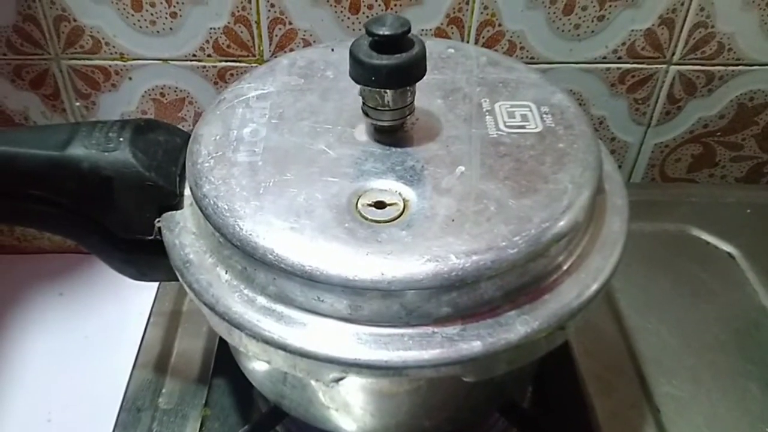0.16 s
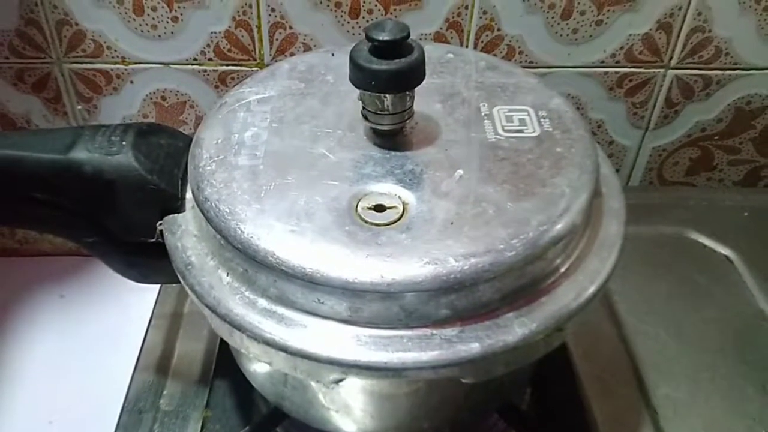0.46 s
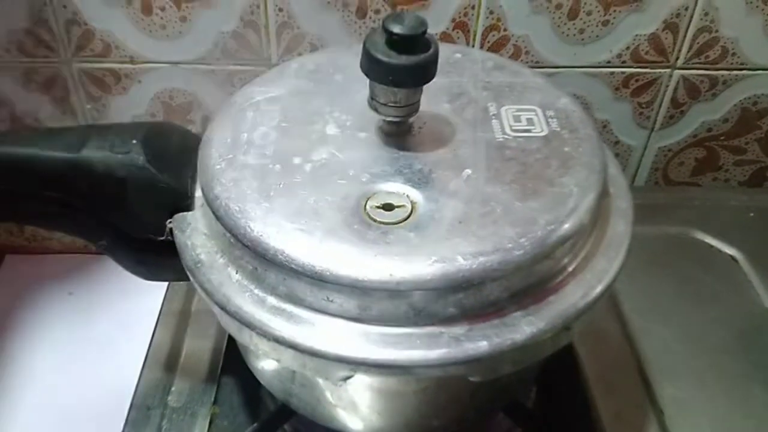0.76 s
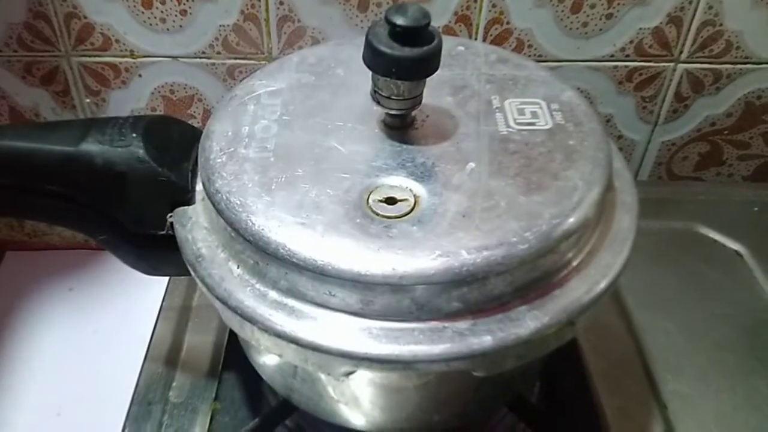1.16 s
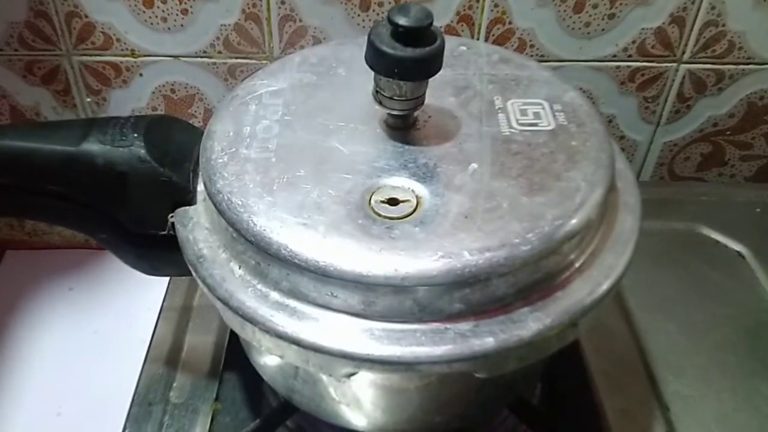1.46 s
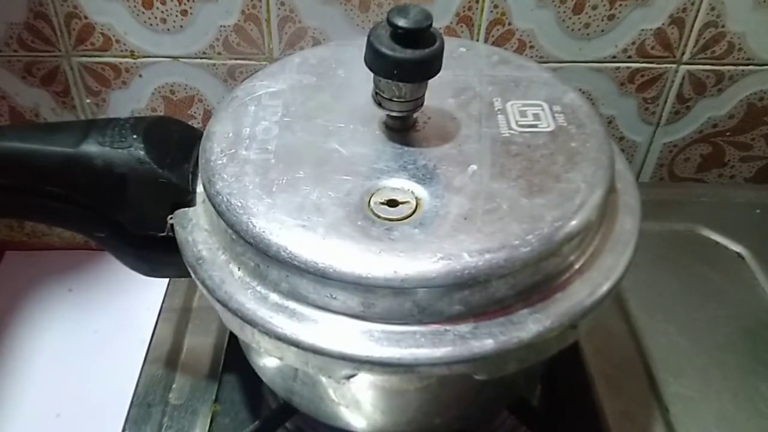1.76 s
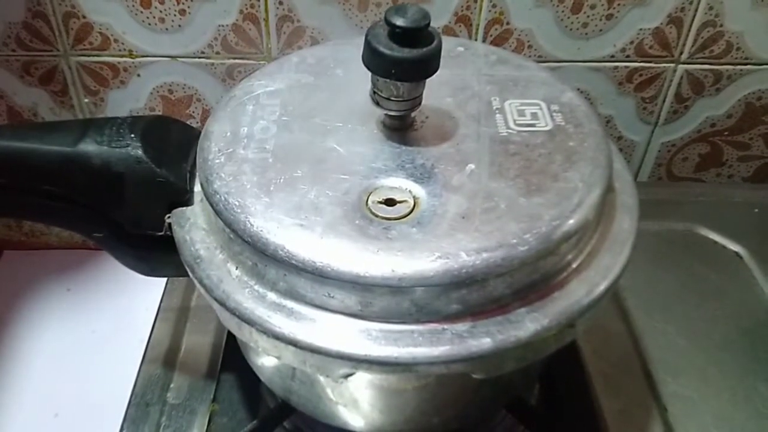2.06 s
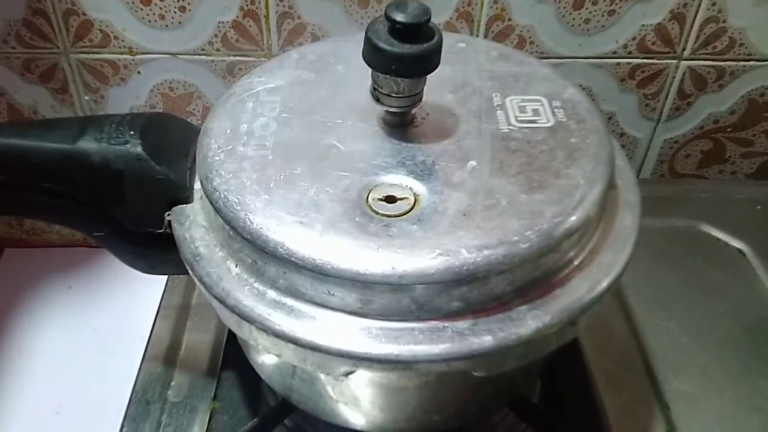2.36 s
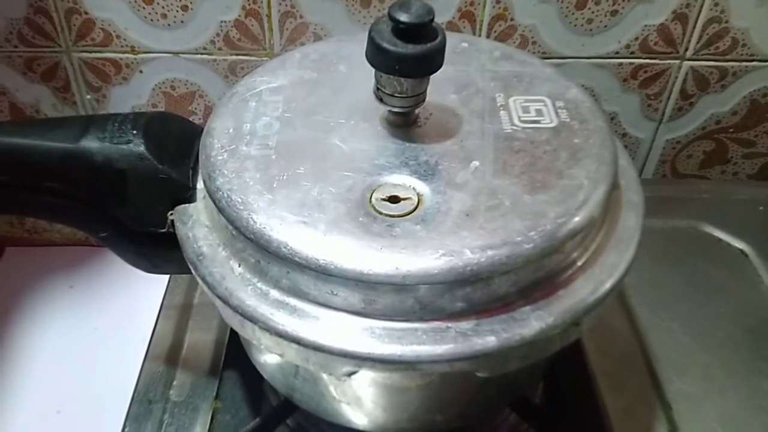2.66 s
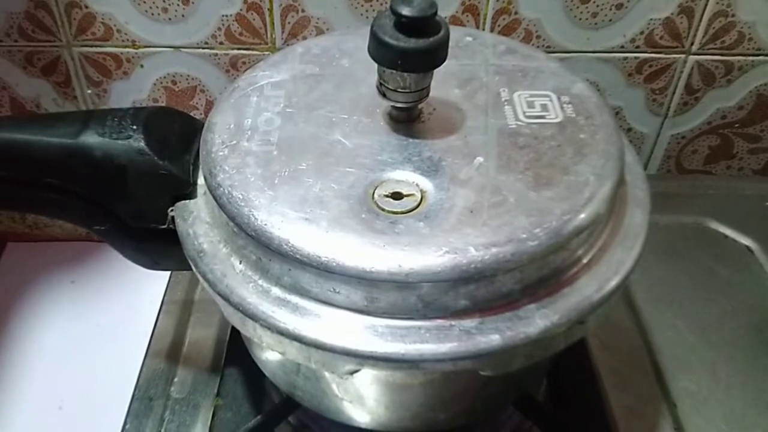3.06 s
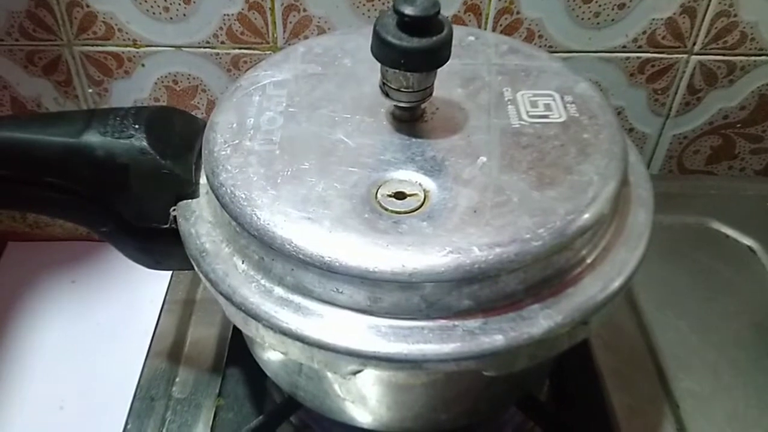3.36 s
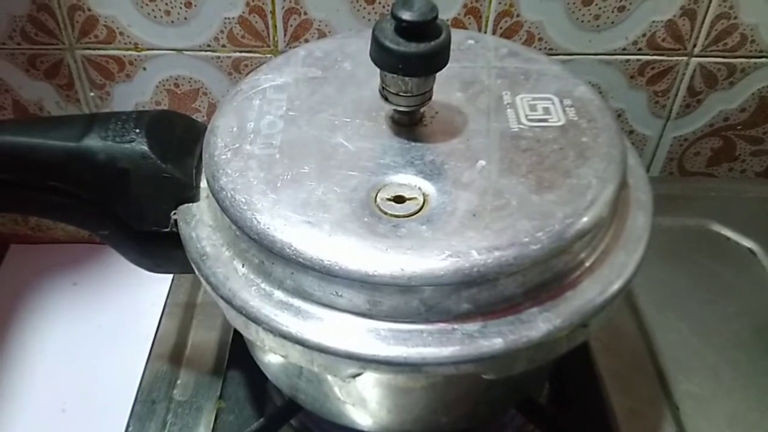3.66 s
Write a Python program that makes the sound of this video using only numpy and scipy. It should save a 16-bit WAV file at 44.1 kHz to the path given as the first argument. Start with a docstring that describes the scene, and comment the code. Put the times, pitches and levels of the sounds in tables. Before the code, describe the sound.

A pressure cooker vents steam in a kitchen, heard very close. For the first 0.5 s a thin, high hiss seeps over a low, fluttering gas burner rumble. Around 0.53 s the weight lifts with a short knock and a loud, bright, rushing jet bursts out, harsh with microphone overload. A softer knock at 0.75 s is nearly buried. The roar holds steady until 3.8 s, its top dulling slightly, left side stronger.

```python
"""A pressure cooker on a gas stove, close to a phone with two microphone ports, for 3.8 s.
The burner rumbles underneath, as low noise, while steam noise seeps thinly under the weight.
At about half a second the weight lifts with a small knock of decaying sines and the jet roars out as
coloured noise; flat noise of the overloaded microphones joins it and the rumble is heard more faintly.
A softer knock follows at 0.75 s; the rumble comes up again and the top of the jet fades as pressure drops."""
import sys
import numpy as np
from scipy import signal
from scipy.fft import rfft, irfft
from scipy.io import wavfile
from scipy.ndimage import uniform_filter1d

SR = 44100
rng = np.random.default_rng(int(sys.argv[2]) if len(sys.argv) > 2 else 0)


def convert_level_to_amplitude(level_db):
    """Map a level in decibels to its linear amplitude factor."""
    exponent = np.asarray(level_db, float) / 20
    return 10 ** exponent


def put_to_file(sound):
    """Save the sound as 16-bit audio at rate SR, in the file named by the first command-line argument."""
    columns = np.atleast_2d(sound).T  # one column per channel
    safe = np.clip(columns, -1, 1)
    whole_steps = np.round(safe * 32767)
    wavfile.write(sys.argv[1], SR, whole_steps.astype(np.int16))


N = 167580  # samples, 3.8 s

STEAM_DB = -6  # trim added to the level curves of the seep and of the jet's roar


def curve(table, column=1):
    """One column of a table as a line over time."""
    rows = np.array(table)
    return np.interp(np.arange(N) / SR, rows[:, 0], rows[:, column])


def colour(table, hz):
    """Gain of a (frequency [Hz], level [dB]) table on a log-frequency axis."""
    rows = np.array(table)
    return convert_level_to_amplitude(np.interp(np.log(hz + 1), np.log(rows[:, 0]), rows[:, 1]))


def walk(rate):
    """Random levels held 1 / rate s and slewed twice; spread 1."""
    hold = int(SR / rate)
    steps = np.repeat(rng.standard_normal(N // hold + 1), hold)
    line = uniform_filter1d(uniform_filter1d(steps, hold), hold)[:N]
    return (line - line.mean()) / line.std()


ECHO_T60_S, ECHO_DB = 0.14, 3.5  # echo energy against the direct sound, before the paths are flattened
PORT_LAG_S = 5e-5  # the common noise reaches the left port this much later


def turbulence(shared):
    """Spectra of two noises; a common part (power share 0-1) reaches each port by its own short echoes."""
    t = np.arange(8192) / SR
    echoes = convert_level_to_amplitude(ECHO_DB) * rng.standard_normal((2, 8192)) * convert_level_to_amplitude(-60 * t / ECHO_T60_S)
    echoes *= np.sqrt(2 * np.log(1000) / (ECHO_T60_S * SR))  # unit energy over the whole decay
    echoes[:, 0] = 1  # direct sound
    paths = rfft(echoes, N)
    paths[0] *= np.exp(-2j * np.pi * np.arange(N // 2 + 1) * SR / N * PORT_LAG_S)
    paths /= np.sqrt(uniform_filter1d(np.abs(paths) ** 2, size=1500))  # only the fine ripple stays
    shared = np.clip(shared, 0, 1)
    common = np.sqrt(shared) * paths * rfft(rng.standard_normal(N))
    separate = np.sqrt(1 - shared) * rfft(rng.standard_normal((2, N)))
    return common + separate


SWELL_DB, SPUTTER_DB, FLICKER_DB = 0.52, 0.49, 0.3  # rms spread of each random level
DULL_FULL_HZ = 18000  # the dulling grows as frequency ** 4 and would be whole here


def restless(spectra, hz, dull_db):
    """Steam noise in overlapping bands that swell and sputter together and flicker alone."""
    centres = np.geomspace(100, 16000, num=16)
    place = np.interp(np.log(hz + 1), np.log(centres), np.arange(len(centres)))
    together = SWELL_DB * walk(1.58) + SPUTTER_DB * walk(25.15)
    out = 0
    for k, centre in enumerate(centres):
        share = np.clip(1 - np.abs(place - k), 0, 1)
        dulling = dull_db * min(centre / DULL_FULL_HZ, 1.5) ** 4
        level_db = together + FLICKER_DB * walk(9.02) + dulling
        out = out + convert_level_to_amplitude(level_db) * irfft(spectra * share, N)
    return out


# colour of the burner rumble: (frequency [Hz], relative level [dB per Hz])
BURNER_COLOUR = [(12, -50), (25, -27), (42, -18), (56, -6), (66, 1), (78, -3), (95, -13), (130, -16),
                 (170, -32), (300, -28), (500, -57)]
# the phone's gain turns the rumble down as the jet opens, and later back up; drawn as a fixed curve:
# (time [s], level [dB])
BURNER_LEVEL = [(0, -47), (.15, -45), (.33, -41.5), (.45, -43), (.6, -52), (.9, -51), (1.7, -55),
                (2.1, -44.5), (2.5, -48.5), (2.9, -42.5), (3.2, -40), (3.45, -47), (3.8, -50)]
BURNER_FLUTTER_DB = 2  # rms spread of the flutter
BURNER_EVEN = 0.42  # evenness 0-1 of the roar from moment to moment


def burner(hz):
    """Fluttering low roar of the gas flame: coloured noise, its own swells partly evened out."""
    roar = irfft(rfft(rng.standard_normal(N)) * colour(BURNER_COLOUR, hz), N)
    slow_power = uniform_filter1d(uniform_filter1d(roar ** 2, size=4000), size=4000)
    roar = roar / slow_power ** (np.clip(BURNER_EVEN, 0, 1) / 2)
    roar = roar * convert_level_to_amplitude(BURNER_FLUTTER_DB * walk(8.05))
    return roar / roar.std() * convert_level_to_amplitude(curve(BURNER_LEVEL))


# colour of the thin seep at the left and the right port: (frequency [Hz], relative level [dB per Hz])
SEEP_COLOUR_LEFT = [(220, -34), (730, -34.5), (1080, -31), (2580, -25.5), (3060, -18.5), (3400, -27),
                    (3920, -19), (4740, -17.5), (5340, -10.5), (6240, -11.5), (6500, -11.5), (7970, -20.5),
                    (9470, -13.5), (12270, -20.5), (13520, -19.1), (15460, -27)]
SEEP_COLOUR_RIGHT = [(220, -33), (650, -38.5), (2410, -27.5), (2760, -23), (4780, -28), (6120, -27),
                     (7060, -39), (7750, -33.5), (8010, -44.5), (9390, -24), (11670, -28.6), (13310, -21),
                     (15030, -34.1), (15460, -47.0)]
# the seep swells, then gives way as the weight lifts: (time [s], level before STEAM_DB [dB])
SEEP_LEVEL = [(0, -0.5), (.1, -0.5), (.2, 1), (.3, 0), (.43, 0.5), (.445, 3), (.47, 4), (.5, 2), (.53, 8.5),
              (.56, -10), (.62, -40)]
SEEP_SHARED, SEEP_SHARED_BASS_HZ = 0.58, 500  # power share common to both ports, rising to 1 in the bass


def seep(hz):
    """Thin hiss of steam under the seated weight; its bass is alike at both ports but for the echoes."""
    ports = np.array([colour(SEEP_COLOUR_LEFT, hz), colour(SEEP_COLOUR_RIGHT, hz)])
    shared = SEEP_SHARED + (1 - SEEP_SHARED) / (1 + (hz / SEEP_SHARED_BASS_HZ) ** 2)
    hiss = restless(turbulence(shared) * ports, hz, 0)
    return hiss * convert_level_to_amplitude(STEAM_DB + curve(SEEP_LEVEL))


# ringing modes of the weight and lid: (frequency [Hz], relative level [dB], decay by 60 dB [s])
WEIGHT_MODES = [(304, -6, 0.044), (530, -1, 0.044), (756, -4, .03), (1000, 1.5, 0.032), (1300, -2, .04),
                (1900, 1, 0.033), (2300, 4, .02), (2780, 5, 0.03), (3470, 6, .02)]
# knocks of the weight as it lifts and settles: (time [s], level [dB])
WEIGHT_KNOCKS = [(.534, -22.5), (.75, -30)]
KNOCK_PUSH_S = .003  # time constant of the soft onset


def knock():
    """Soft pushes ring the weight and lid briefly as decaying sines."""
    out = 0
    for start, level_db in WEIGHT_KNOCKS:
        t = np.clip(np.arange(N) / SR - start, 0, 1)
        ring = sum(convert_level_to_amplitude(db - 60 * t / t60) * np.sin(2 * np.pi * f * t) for f, db, t60 in WEIGHT_MODES)
        push = 1 - np.exp(-t / KNOCK_PUSH_S)
        out = out + convert_level_to_amplitude(level_db) * ring * push
    return out


# colour of the open jet at the left and the right port, lid and tile echoes included:
# (frequency [Hz], relative level [dB per Hz])
JET_COLOUR_LEFT = [(220, -19), (1850, -18), (2840, -7), (3450, -9.5), (4440, -5), (5510, -1.7),
                   (5640, -4.5), (5810, -0.1), (6420, -5.5), (6550, -1.8), (7110, -4), (7620, -9),
                   (8230, -8), (8790, -6), (9090, -0.2), (9260, -9.5), (9390, -2.1), (9560, -2),
                   (10470, 1.2), (10640, -3.5), (11370, 0.5), (12580, -10), (12960, -3), (13440, -10),
                   (14990, -9), (15460, -15.5)]
JET_COLOUR_RIGHT = [(220, -29.5), (860, -31.5), (1420, -19), (3270, -9), (3880, -12), (5120, -10),
                    (5340, -18), (6160, -15), (6850, -19), (6980, -21.2), (7110, -21), (7540, -25),
                    (7710, -23.4), (7920, -18.9), (8270, -27.6), (8480, -28), (8960, -15), (9430, -12),
                    (10120, -7.5), (10470, -9), (10980, -12), (11540, -6.5), (11800, -12), (13090, -7.9),
                    (15120, -16), (15460, -15)]
# the valve opens: (time [s], roar level before STEAM_DB [dB], overload noise before the port levels [dB])
VENT_LEVELS = [(.44, -44, -60), (.49, -22, -34), (.52, -11, -24), (.535, -3, -2), (.565, 0, 2),
               (.9, 0.5, 2), (1.3, 0, 0), (1.8, -0.5, .5), (2.2, 0.5, 0), (2.6, 0, -1), (3.0, 0, -4),
               (3.4, 0, -4.5), (3.8, 1, -6)]
JET_SHARED = 0.46  # power share of the roar common to both ports
DULLING_DB_PER_S = -1.3  # slope at DULL_FULL_HZ: the top of the jet fades as pressure drops
RIGHT_FADE_DB_PER_S = -0.65  # the right port loses the roar a little faster
OVERLOAD_LEFT_DB, OVERLOAD_RIGHT_DB, OVERLOAD_TOP_HZ = -16, -37, 7000
LOW_CUT_HZ = 30  # for roar and overload noise


def jet(hz):
    """Steam roar of the open valve, plus flat overload noise of the microphones, strongest at the left."""
    t = np.arange(N) / SR
    low_cut = hz ** 2 / (hz ** 2 + LOW_CUT_HZ ** 2)
    ports = np.array([colour(JET_COLOUR_LEFT, hz), colour(JET_COLOUR_RIGHT, hz)]) * low_cut
    # both slow fades pivot at 2 s
    roar = restless(turbulence(JET_SHARED) * ports, hz, DULLING_DB_PER_S * (t - 2))
    roar = roar * convert_level_to_amplitude(np.outer([0, RIGHT_FADE_DB_PER_S], t - 2))
    high_cut = 1 / np.sqrt(1 + (hz / OVERLOAD_TOP_HZ) ** 2)
    overload = irfft(rfft(rng.standard_normal((2, N))) * high_cut * low_cut, N)
    overload = overload * convert_level_to_amplitude([[OVERLOAD_LEFT_DB], [OVERLOAD_RIGHT_DB]]) * convert_level_to_amplitude(0.95 * walk(16))
    return roar * convert_level_to_amplitude(STEAM_DB + curve(VENT_LEVELS)) + overload * convert_level_to_amplitude(curve(VENT_LEVELS, column=2))


def scene():
    """Burner and knock are common to both ports; seep and jet differ between them."""
    hz = np.arange(N // 2 + 1) * SR / N
    return burner(hz) + seep(hz) + knock() + jet(hz)


def roll_off(x):
    """The treble ends steeply here."""
    return signal.sosfilt(signal.butter(12, 16620, fs=SR, output="sos"), x)


ROUGH_HZ, ROUGH_PEAK_S, ROUGH_DB = SR / 1024, .0083, 1.22  # slight even 43 Hz roughness of the level
DRIVE, TOP_HZ = .9, 15650  # gain into the soft limit; upper edge of the passband


def record(dry):
    """A slight even 43 Hz roughness lies on the level; the phone rounds the loudest peaks, cuts the top."""
    t = np.arange(N) / SR
    roughness = convert_level_to_amplitude(ROUGH_DB * np.cos(2 * np.pi * ROUGH_HZ * (t - ROUGH_PEAK_S)))
    rounded = np.tanh(DRIVE * roughness * dry) / DRIVE
    top_cut = signal.ellip(10, .2, 70, TOP_HZ, fs=SR, output="sos")
    mix = signal.sosfilt(top_cut, rounded)
    return roll_off(mix)


dry = scene()
out = record(dry)
put_to_file(out)
```